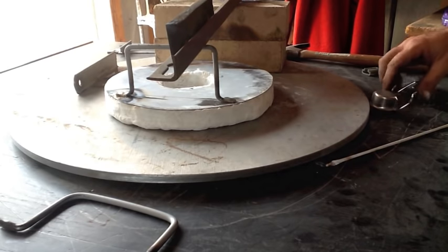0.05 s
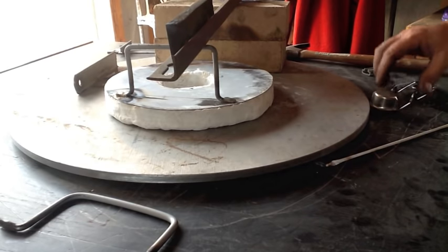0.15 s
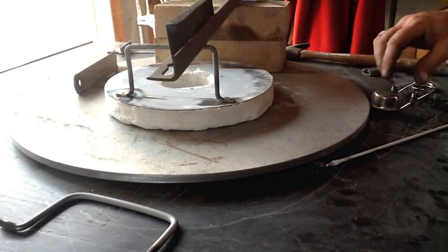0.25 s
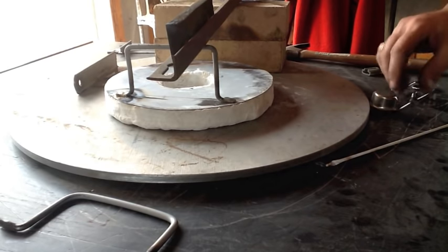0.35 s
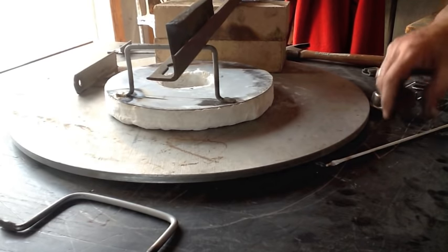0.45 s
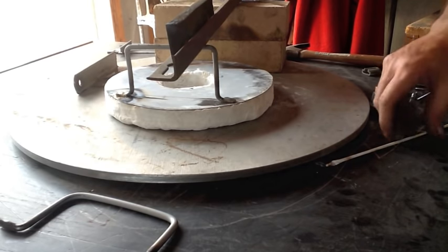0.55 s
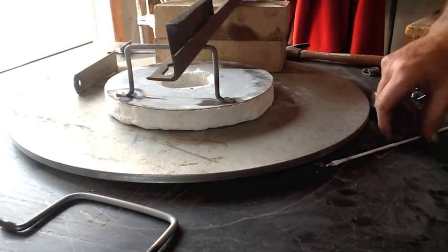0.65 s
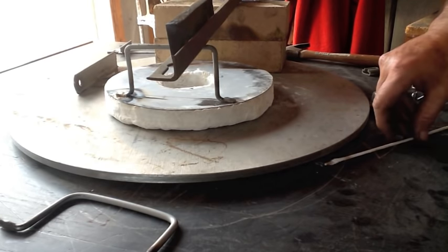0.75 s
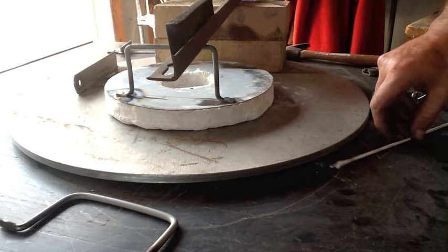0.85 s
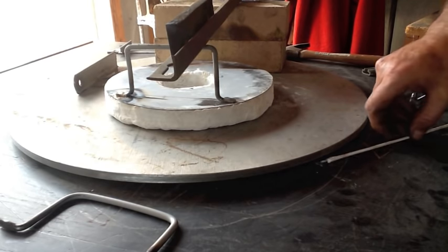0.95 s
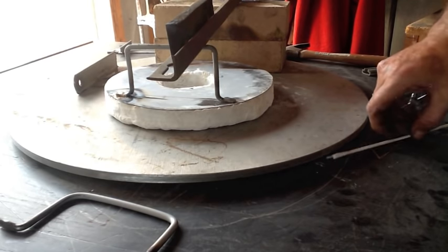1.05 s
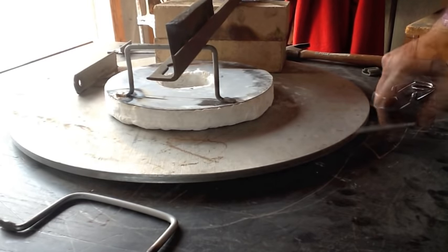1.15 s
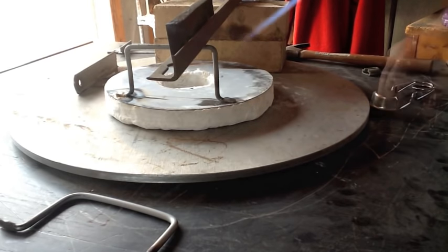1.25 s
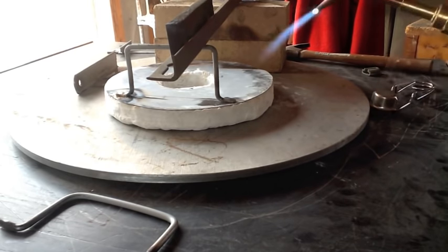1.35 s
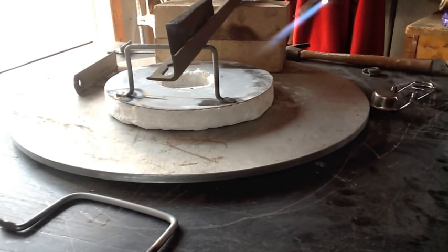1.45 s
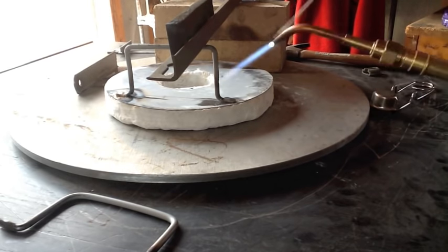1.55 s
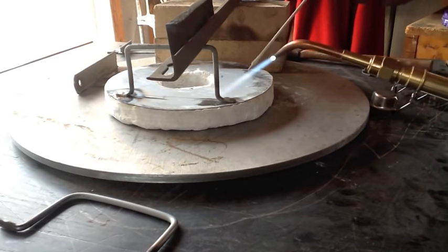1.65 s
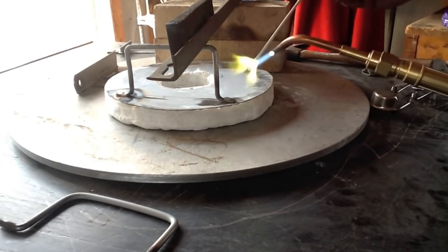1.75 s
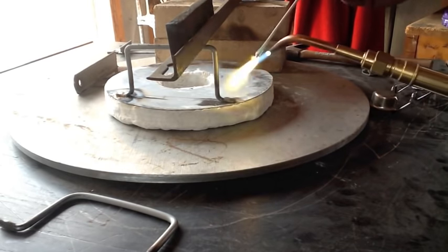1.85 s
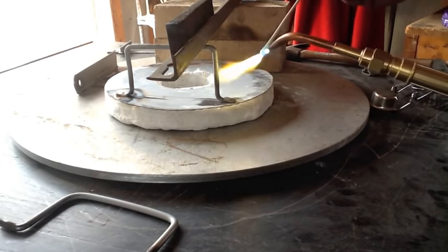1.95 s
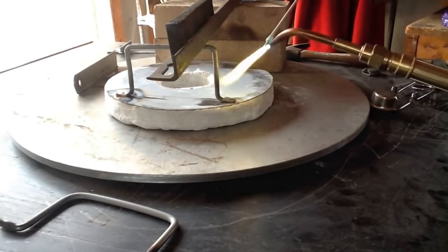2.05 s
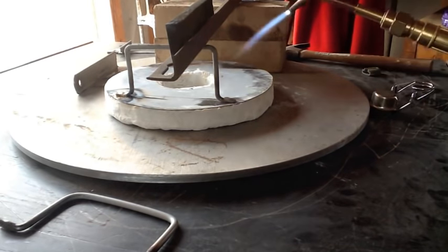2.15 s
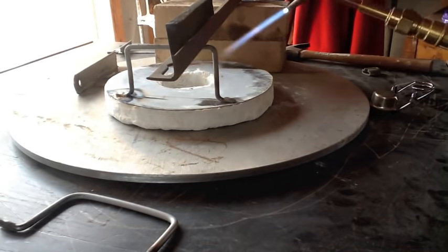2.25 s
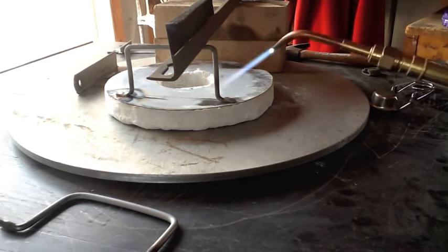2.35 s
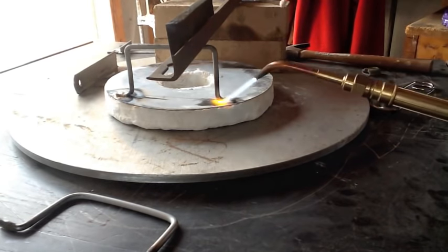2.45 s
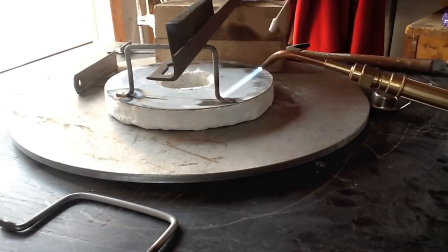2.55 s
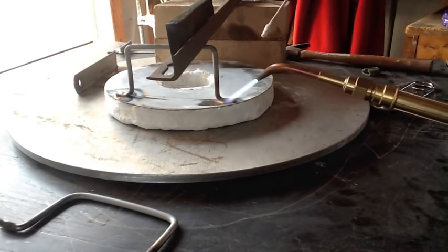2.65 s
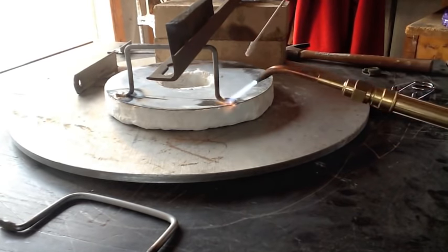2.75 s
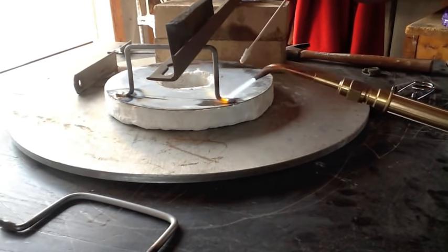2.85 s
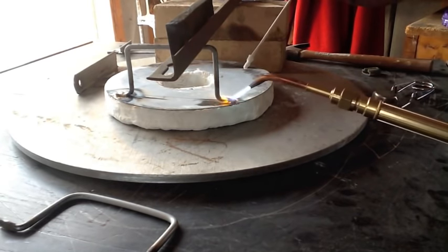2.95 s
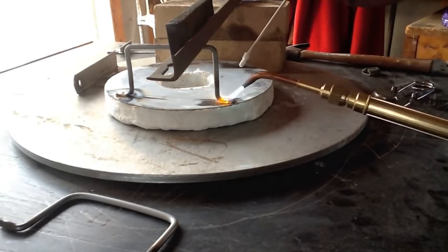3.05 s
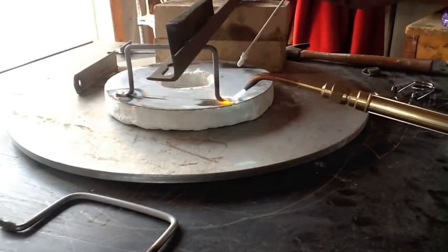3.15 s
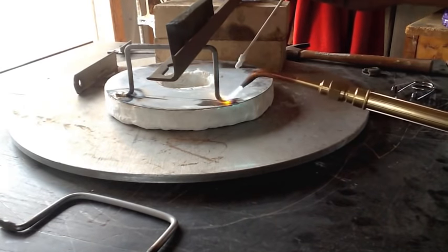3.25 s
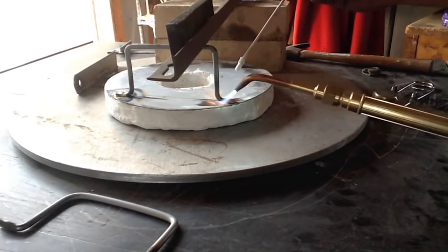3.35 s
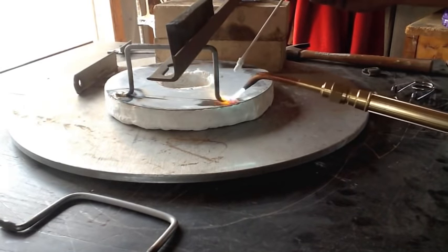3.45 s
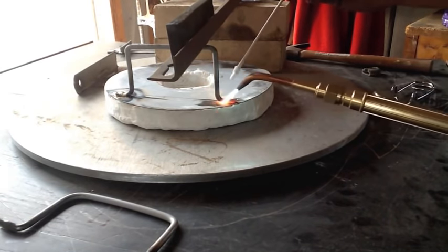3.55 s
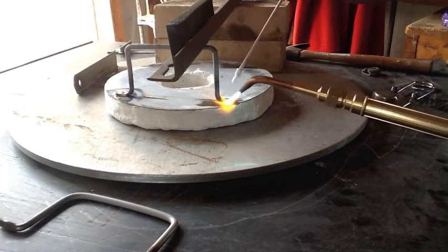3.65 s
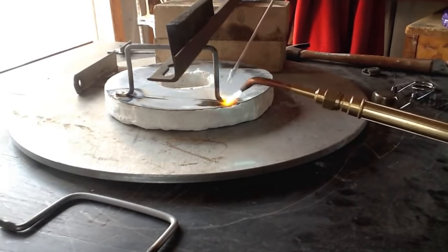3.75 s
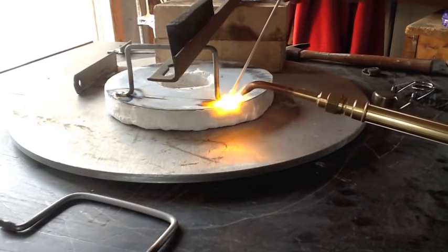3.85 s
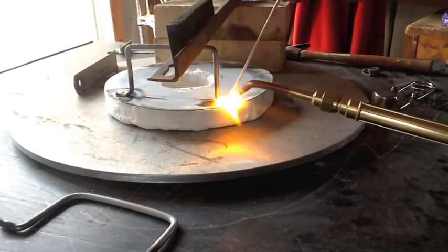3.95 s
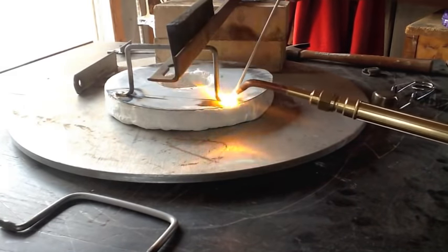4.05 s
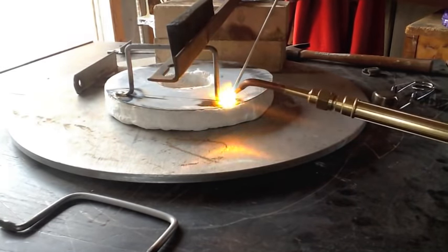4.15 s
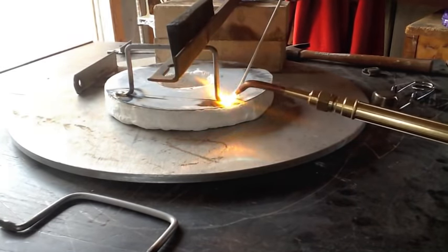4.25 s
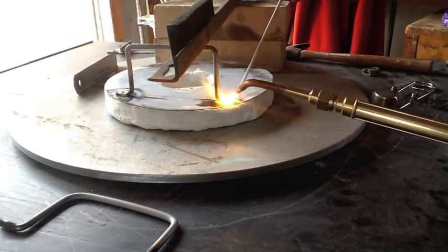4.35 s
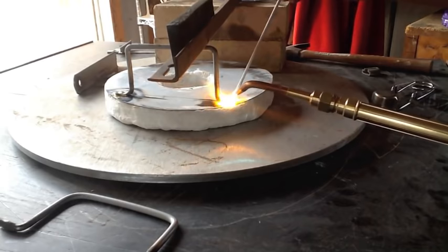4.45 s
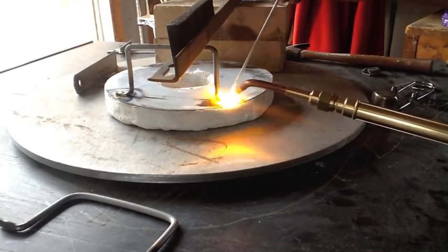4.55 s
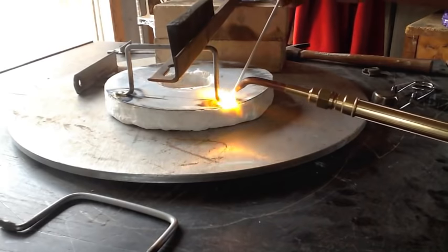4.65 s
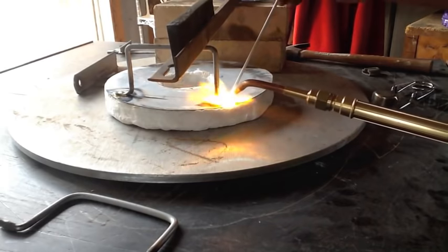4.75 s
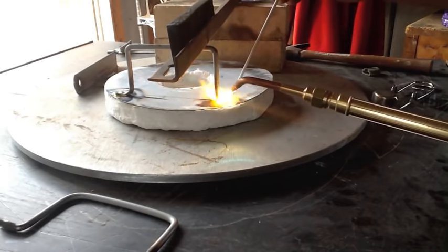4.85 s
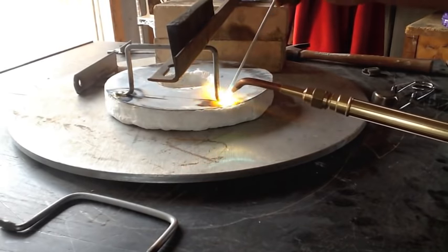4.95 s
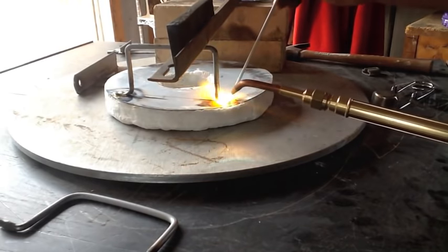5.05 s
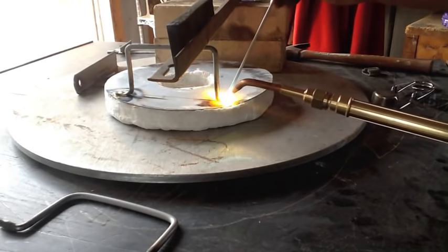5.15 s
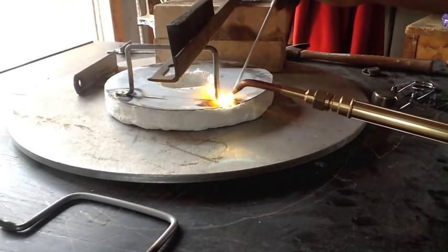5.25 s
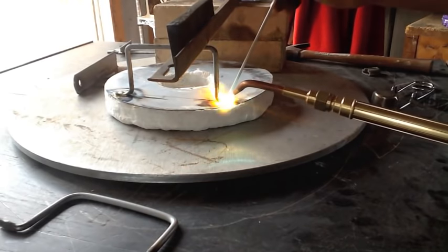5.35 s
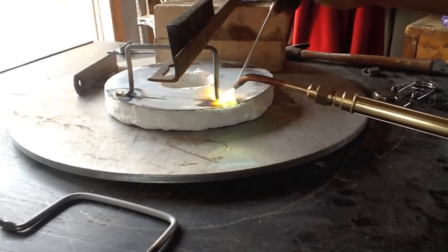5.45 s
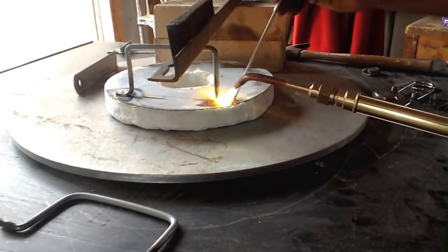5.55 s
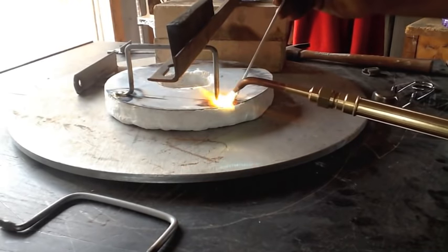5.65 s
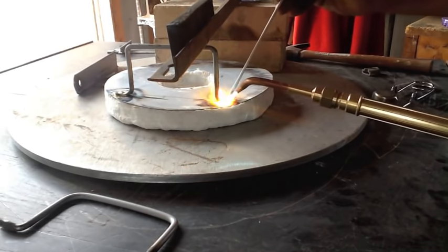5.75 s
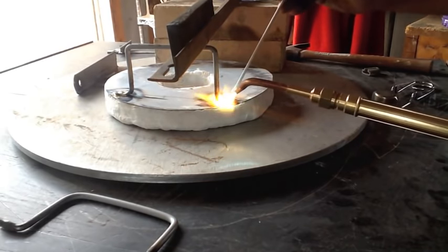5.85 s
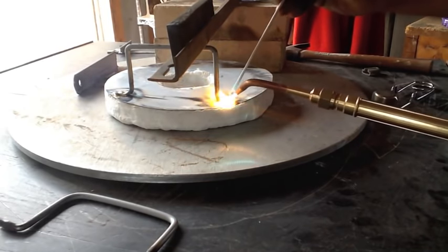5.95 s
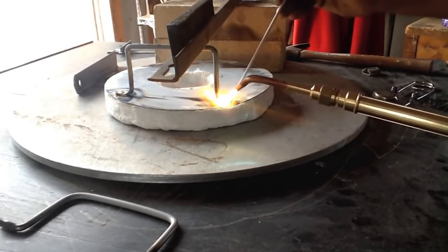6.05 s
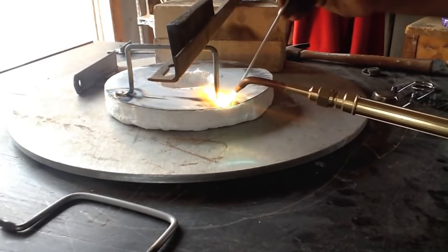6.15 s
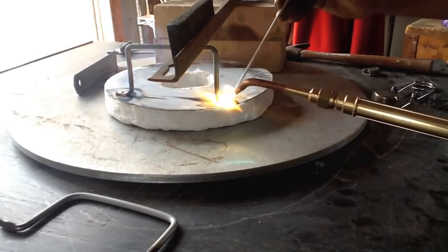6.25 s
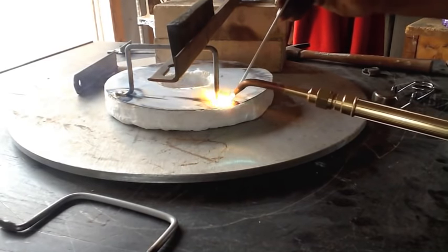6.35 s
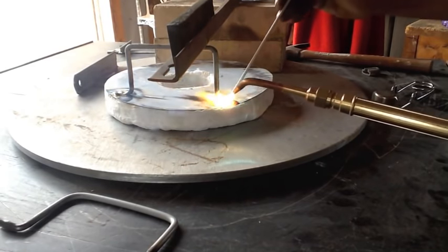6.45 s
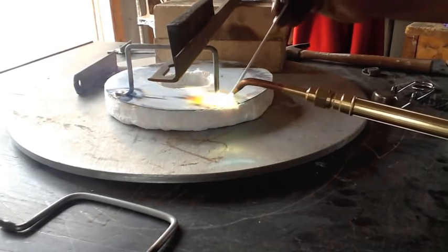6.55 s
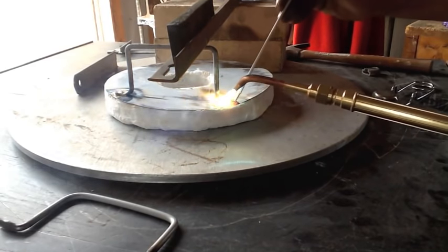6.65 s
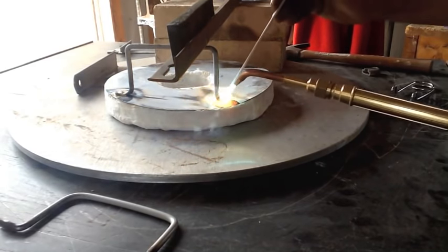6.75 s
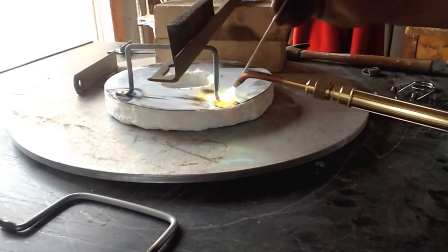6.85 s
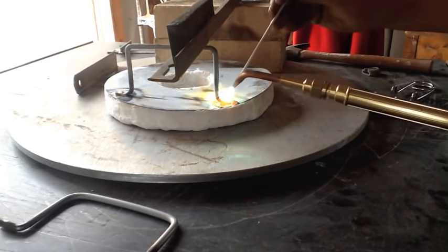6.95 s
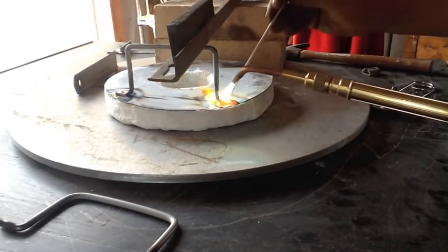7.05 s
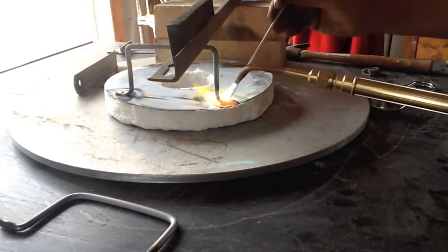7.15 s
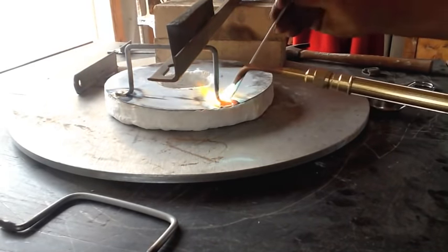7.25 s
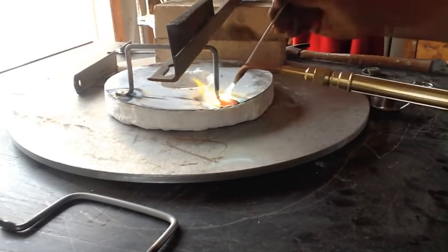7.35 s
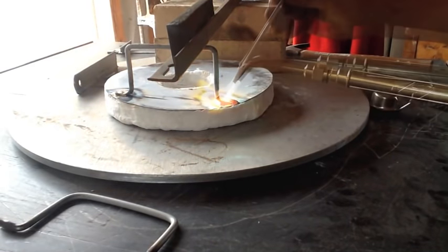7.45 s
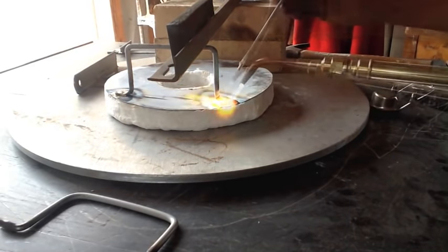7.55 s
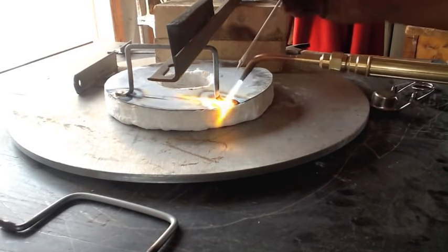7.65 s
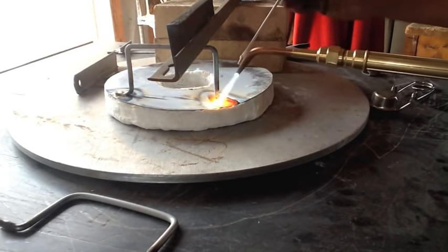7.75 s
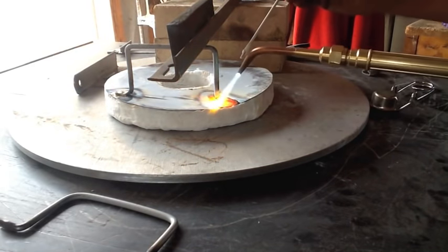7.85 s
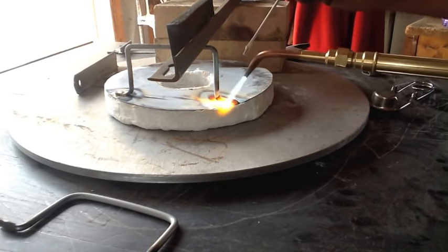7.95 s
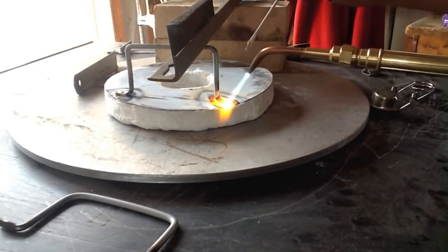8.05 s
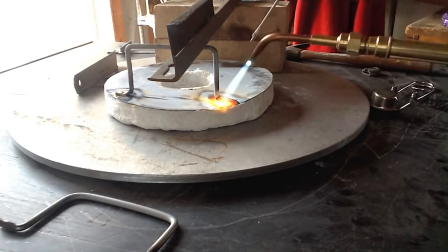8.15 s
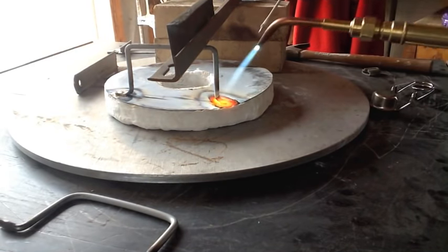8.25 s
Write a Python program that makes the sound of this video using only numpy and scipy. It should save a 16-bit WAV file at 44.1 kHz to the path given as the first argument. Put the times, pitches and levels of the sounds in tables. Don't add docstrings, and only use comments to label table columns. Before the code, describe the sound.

A steel striker clanks twice on a bench in a humming workshop, then a torch hisses, flutters and pops before the room rumble returns.

```python
import sys
import numpy as np
from scipy import signal
from scipy.fft import rfft, irfft, next_fast_len
from scipy.io import wavfile

SR = 44100
rng = np.random.default_rng(int(sys.argv[2]) if len(sys.argv) > 2 else 0)


def bounce(signal):
    frames = np.transpose(np.atleast_2d(signal))
    limited = np.clip(frames, -1, 1)
    pcm = np.round(limited * 32767).astype(np.int16)
    wavfile.write(sys.argv[1], SR, pcm)


def undo_db(level):
    steps = np.asarray(level, float) / 20
    return 10 ** steps


N = 365941

# start_s, end_s
TO_TORCH, TO_SHOP = (1.15, 1.533), (7.348, 7.85)
SHOP_TOP_HZ, TOP_HZ = 15250, 15760
LOW_CUT_HZ = 736

# freq_hz, level_db (per Hz)
RUMBLE_BEFORE = [(15, -77), (25, -45), (85, -37), (104, -27), (123, -17), (151, -9), (243, -12), (391, -16),
                 (790, -14.5), (1470, -23), (1700, -23), (2040, -29), (2730, -32.5), (3500, -43),
                 (4550, -69), (7700, -120)]
# freq_hz, level_db (per Hz)
RUMBLE_AFTER = [(15, -65), (25, -47), (145, 1), (325, -8.5), (416, -4), (471, -6.5), (669, -3), (758, -5.5),
                (932, -4.5), (1010, -7), (1500, -11.5), (1840, -16), (2620, -21), (3500, -26), (4550, -54),
                (7700, -120)]
# freq_hz, level_db (per Hz)
AIR = [(880, -33), (1500, -36), (1820, -9), (2460, -7), (4100, -9.5), (4470, -9), (15100, -17)]
# rumble_db, air_db
BED_BEFORE, BED_AFTER = (-47, -51.5), (-45.5, -50)
AIR_FLICKER_DB, RUMBLE_AFTER_FLICKER_DB = 0.6, 0.8
ECHO_DB, ECHO_T60_S = (11, 17), (0.31, 0.14)

HUM_HZ, HUM_SAG_HZ_PER_S = 124.8, 2.75
HUM_ORDERS_DB, HUM_THROB_DB = (-49, -60.5, -73), (1.0, 5.5, 3)
HUM_START_DB = 7.5
HUM_SINK_S, HUM_SINK_DB_PER_S = 1.04, 18
THIRD_S, THIRD_RISE_S, THIRD_DB = 1.2, 0.13, 18.5
# centre_s, lift_db, length_s
HUM_SWAYS = [(.32, 1, 0.17), (.54, 0, .06), (.64, 3, .12), (.845, -11, 0.056), (1.09, 3, .06)]

# time_s, pitch_hz, level_db
WHINE_EARLY = [(1.66, 1282, -59), (1.71, 1270, -55), (1.755, 1258, -59), (1.8, 1245, -52.5),
               (1.9, 1220, -53), (1.97, 1200, -58), (2.04, 1184, -56), (2.1, 1172, -60)]
WHINE_MIDDLE = [(4.02, 1102, -60), (4.19, 1082, -58), (4.35, 1058, -61), (4.55, 1042, -58),
                (4.85, 1021, -54), (5.15, 1008, -63), (5.3, 1012, -70), (5.6, 1025, -65), (5.9, 1036, -63),
                (6.08, 1048, -64), (6.3, 1057, -55), (6.62, 1041, -55), (6.78, 1026, -64)]
WHINE_FAR = [(7.17, 1210, -83), (7.4, 1194, -64), (7.68, 1180, -62)]
# time_s, pitch_hz, level_db
COASTING = [(4.35, 1047, -60), (4.9, 1016, -57.5), (5.2, 1003, -62.5), (5.75, 1031, -62)]
PULLING = [(5.5, 1033, -70), (5.9, 1034, -65), (6.3, 1048, -59.5), (6.8, 1037, -70)]
# multiple (of the reference line), level_db
ORDERS_EARLY = [(.752, -7), (1, 0)]
ORDERS_SINGLE = [(1, 0.9)]
COASTING_ORDERS = [(.5, -20), (0.699, -15), (1.23, -11)]
PULLING_ORDERS = [(.4, -24), (.72, -15), (.8, -14), (1.2, -6), (1.4, -1)]

# time_s, level_db
DRAG = [(8.15, -39), (8.19, -39), (8.203, -32), (8.22, -53), (8.236, -34), (8.26, -26), (8.285, -25),
        (8.3, -45)]
# start_s, peak_db
SLIPS = [(8.167, -30), (8.184, -31), (8.2003, -28), (8.212, -37), (8.223, -32), (8.2353, -27), (8.239, -29),
         (8.244, -25), (8.255, -33), (8.2595, -27), (8.269, -34), (8.271, -21), (8.274, -34), (8.2805, -31),
         (8.284, -32), (8.2885, -31), (8.295, -26)]
# freq_hz, width_hz, level_db
BENCH = [(242, 50, 1.5), (418, 90, -2), (630, 80, 2), (800, 150, -2), (1270, 200, -10)]

# start_s, peak_db, ring_db, room_db, dulling_db (per octave above the first crack mode)
CLANKS = [
    (.0539, -6, -21.5, -17, -.5),
    (.0884, -14, -21.5, -20, -2),
]
# freq_hz, level_db, t60_s
CRACK = [(2330, 6.5, 0.017), (2070, -5, .03), (2900, -2, .010), (3450, 3.5, 0.013), (4100, 3.5, .007),
         (4880, 5.5, 0.0105), (7130, -9, 0.015), (8170, -13, .015), (9450, -9, 0.018), (10400, -14, .02),
         (14650, -13, .03)]
# freq_hz, level_db, t60_s
STEEL = [(305, -3, 0.07), (362, -4, 0.09), (538, -4, 0.12), (800, -6, 0.11), (1050, -9, 0.083),
         (2336, -3, 0.14), (2625, -6, 0.11), (3235, -8, 0.12), (3930, -7, .13), (5930, -3, 0.1),
         (6500, -5, 0.1), (9170, -4, 0.2), (13050, -11, 0.3), (14700, -7, .08), (14910, -5, .07)]
# freq_hz, level_db, t60_s
EARLIER_RING = [(744, -7, 0.28), (787, -13, 0.16), (843, -6, 0.23), (1073, -4, 0.072), (1440, -2, 0.15),
                (1900, -13, .26), (5800, -19, 0.23), (6710, -16, .25), (6821, -13, .25), (8630, -12, 0.23),
                (8680, -16, 0.22), (10660, -16, 0.2), (10800, -16, .2), (14710, -8, .072)]
# freq_hz, level_db (per Hz)
CLANK_TAIL = [(88, -39), (150, -34), (249, -11), (979, -6), (1190, -11.5), (2270, -4.5), (2980, -7.5),
              (4760, -10), (13700, -19), (14800, -22), (16000, -41)]
SHOP_T60_S = 0.22
BLOOM_S = 0.0032
CONTACT_S = 0.00028

# time_s, pitch_hz, level_db
SQUEAL = [(3.26, 5200, -60), (3.28, 5120, -58), (3.32, 5200, -55), (3.345, 4750, -59)]
SQUEAL_WIDTH_HZ = 130

# centre_s, peak_db, pitch_hz
TICKS = [(1.3975, -33, 4000), (1.545, -34, 5000), (2.4402, -34, 5000), (2.4485, -33, 5900),
         (2.4571, -37, 6300), (2.4636, -35, 3900), (2.4824, -30, 7300), (2.5054, -28, 5400),
         (2.5362, -37, 7200), (2.5529, -33, 5600), (2.5583, -30, 7300), (2.5612, -32, 6600),
         (2.5765, -34, 7100), (2.5792, -36, 5700), (2.5821, -30, 7700), (2.5854, -36, 7300),
         (2.5999, -37, 5800), (2.6044, -34, 6800), (2.6126, -37, 4400), (2.6651, -36, 5600),
         (2.6856, -33, 6400), (2.8249, -36, 4500), (2.8683, -31, 4200), (4.3678, -36, 6000),
         (4.9951, -36, 7000), (5.0999, -36, 4100), (5.409, -34, 9700), (6.4342, -37, 7000),
         (6.4363, -35, 7200)]
TICK_CYCLES = 0.55

# start_s, peak_db, pitch_hz
POPS = [(1.8045, -32, 1890), (2.2057, -26, 1730), (2.4632, -29, 1980), (2.482, -31, 1800),
        (2.604, -41, 1500), (3.0469, -36, 1070), (2.62, -31, 1890), (2.8499, -23, 1550),
        (2.8599, -29, 1310), (2.825, -37, 1680), (2.891, -29, 1550), (3.0366, -32, 1350),
        (3.1215, -36, 1170), (3.2167, -33, 1230), (3.5865, -22, 1560), (3.595, -26, 1150),
        (3.6244, -29.5, 1350), (3.7174, -32, 2050), (2.9833, -31, 1450), (3.961, -33, 1200),
        (4.041, -23.5, 1580), (4.1597, -25, 1270), (4.171, -24.5, 1460), (4.2603, -28, 1440),
        (4.7584, -29, 2020), (5.0702, -33, 1960), (5.1196, -37, 2350), (5.4082, -33, 1830),
        (5.4517, -30, 2060), (5.9106, -37, 2120), (6.116, -34, 2244), (6.2351, -39, 1963),
        (2.868, -31, 1500), (2.8678, -26, 3080), (2.825, -33, 3400), (3.586, -40, 2900), (4.171, -39, 2300),
        (2.8745, -35, 1300), (2.883, -32, 1200), (3.029, -39, 1100), (3.098, -35, 1400), (3.619, -33, 1600),
        (3.630, -33, 1500), (3.635, -39, 1000), (3.670, -37, 1800), (4.017, -35, 1200), (4.167, -34, 1700),
        (4.179, -35, 1400), (4.268, -38, 1300), (5.919, -39, 1000)]
AFTER_POP_S, AFTER_POP_DB = 0.0045, -13
# start_s, peak_db, centre_hz, length_s
COUGHS = [(1.873, -48.5, 750, 0.032), (2.183, -49, 650, 0.026), (2.463, -52, 600, 0.022),
          (2.848, -42.5, 900, 0.05), (3.025, -46.5, 900, 0.041), (3.111, -44.5, 750, 0.017),
          (3.2, -48, 750, 0.026), (3.582, -39.5, 800, 0.0085), (3.617, -50, 800, 0.015),
          (3.943, -45.5, 900, 0.032), (4.147, -46, 900, 0.039), (4.249, -46.5, 450, 0.038),
          (4.301, -49, 700, 0.071), (5.91, -55, 873, 0.02), (6.749, -48.5, 420, 0.033),
          (6.947, -52, 520, 0.037), (7.019, -60, 450, 0.027)]
# start_s, peak_db, centre_hz, t60_s
SPITS = [(1.581, -42.5, 4830, 0.065), (1.662, -43, 4870, .1), (2.448, -42, 6500, .03),
         (2.481, -50, 10500, .02), (2.505, -36, 4770, 0.012), (2.557, -50, 10500, 0.023),
         (2.579, -50, 10500, 0.027), (4.75, -43.5, 3500, 0.078), (4.991, -42.5, 7000, 0.033),
         (5.092, -46, 3400, 0.067), (5.407, -45, 11930, 0.08), (2.137, -45, 2060, .12),
         (2.263, -42.5, 1950, 0.12), (2.284, -44, 1900, .12), (2.424, -43.5, 1550, 0.071)]
SPIT_WIDTH = 0.33

# freq_hz, level_db (per Hz)
HISS = [(1470, -35.5), (2500, -19), (2780, -5), (3070, -7), (3370, -5), (4050, -4), (5500, -0.5), (6320, 0),
        (9200, -4.5), (15600, -14.5)]
# freq_hz, level_db (per Hz)
BREATH = [(24, -68), (40, -49), (297, -40), (453, -24), (560, -16.5), (667, -17.5), (734, -12.5), (1020, 0),
          (1120, -1.5), (1260, 0.5), (1470, -2), (1820, -2), (2290, -3.5), (4000, -13), (5200, -35),
          (8800, -120)]
HISS_DB, BREATH_DB = -48, -55.5
HISS_GUST_DB, BREATH_GUST_DB = -0.2, 0.45
# time_s, level_db
ROAR = [(1.15, -50.5), (1.4, -45.5), (1.72, -38), (1.8, -43.5), (2.0, -42.5), (2.06, -43.5), (2.14, -42),
        (2.45, -42), (2.52, -74), (2.75, -50.5), (3.1, -51), (3.55, -50.5), (3.9, -57), (4.4, -54),
        (5.0, -50.5), (5.4, -54.5), (6.3, -57.5), (7.5, -58)]
# freq_hz, width_hz, level_db
NOZZLE = [(1230, 80, -4.5), (1550, 125, -1.5), (1890, 120, 1.5), (2215, 170, -1), (2780, 210, -4.5),
          (3530, 370, -7.5), (4790, 530, -7.5), (7000, 1200, -16), (2037, 82, -5.5)]
# centre_s, roar_db, length_s, hiss_lift_db
FLARES = [(1.28, -50, 0.078, 4), (1.395, -48.5, 0.086, 0), (1.56, -51, 0.031, -1), (1.667, -56, 0.058, 4),
          (2.55, -43.5, 0.068, -0.5), (2.581, -42, 0.023, 1), (2.605, -46, 0.057, -2.5),
          (2.661, -45, 0.02, 2), (2.87, -54, 0.045, 0), (3.07, -55, 0.072, 1), (3.29, -71, 0.23, 1),
          (3.365, -68, .04, -1), (3.59, -51, 0.021, -2), (3.69, -46.5, 0.026, 0), (3.753, -49, 0.093, -1),
          (3.928, -63, 0.053, 2.5), (4.115, -57, 0.08, 0.5), (4.59, -60, 0.074, 1.5),
          (4.733, -49, .03, 1.5), (4.764, -46, 0.037, 3.5), (4.903, -63, 0.045, 0), (5.065, -54, .02, -2),
          (5.122, -45, 0.046, 1), (5.408, -50, 0.03, 1.5), (5.45, -53, .025, 2), (5.653, -56, .08, 0.5),
          (6.122, -44.5, 0.032, 1), (6.187, -45.5, 0.074, 1.5), (6.246, -47, 0.057, 0.5),
          (6.374, -58, 0.12, 0), (6.55, -53, 0.091, -1.5)]
# centre_s, lift_db, length_s
GULPS = [(1.335, 2, .04), (1.46, 2, .04), (1.55, 5, .02), (1.59, 0, 0.033), (1.669, -2, .012),
         (1.697, -2, .04), (1.74, 1, .03), (1.785, -2, .03), (1.806, 7, .015), (1.826, -7, .025),
         (1.87, -1, .04), (1.928, 2.5, .05), (1.98, -5, .02), (1.996, 3.5, .025), (2.025, 4, .02),
         (2.057, -4, .025), (2.075, 0, .02), (2.09, -3, .02), (2.115, 6, .025), (2.146, 5, .02),
         (2.17, 6, 0.013), (2.205, 2, .03), (2.235, -1, .04), (2.27, 0, .02), (2.292, 0, 0.03),
         (2.328, 0, .03), (2.348, 5, .02), (2.39, -6, .02), (2.422, 3, .03), (2.455, -4, .03)]


def rms_one(x):
    return x / np.sqrt(np.mean(x ** 2) + 1e-20)


def in_time(rows):
    s, *columns = np.transpose(rows)
    return [np.interp(np.arange(N) / SR, s, c) for c in columns]


def fader(rows, in_s, out_s):
    t = np.arange(N) / SR
    fade_in = np.clip((t - rows[0][0]) / in_s, 0, 1)
    fade_out = np.clip((rows[-1][0] - t) / out_s, 0, 1)
    return fade_in * fade_out


def crossfade():
    return np.interp(np.arange(N) / SR, TO_TORCH + TO_SHOP, [0, 1, 1, 0])


def bell(s, length_s):
    t = np.arange(N) / SR
    return np.cos(np.pi * np.clip((t - s) / length_s, -0.5, 0.5)) ** 2


def bumps(rows):
    return sum(db * bell(s, length_s * 1.16) for s, db, length_s in rows)


def drift(rate_hz):
    r = np.exp(-80 * np.pi * rate_hz / SR)
    noise = rng.standard_normal(N // 40 + 2002)
    slow = signal.lfilter([1], [1, -2 * r, r * r], noise)[2000:]
    return np.interp(np.arange(N) / 40, np.arange(len(slow)), rms_one(slow))


def coloured(spectrum, flicker_db):
    size = next_fast_len(N)
    hz, db = np.transpose(spectrum)
    bins_hz = np.arange(size // 2 + 1) * SR / size
    shape = undo_db(np.interp(np.log(bins_hz + 1), np.log(hz), db))
    noise = rng.standard_normal(N) * undo_db(flicker_db)
    return rms_one(irfft(rfft(noise, size) * shape, size)[:N])


def resonate(x, hz, width_hz):
    r = np.exp(-np.pi * width_hz / SR)
    zeros = np.array([1, 0, -1]) * (1 - r * r) / 2
    return signal.lfilter(zeros, [1, -2 * r * np.cos(2 * np.pi * hz / SR), r * r], x)


def body(x, peaks):
    return sum((-1) ** k * undo_db(db) * resonate(x, hz, width) for k, (hz, width, db) in enumerate(peaks))


def ring(hz, t60, length, turn=None):
    t = np.arange(length) / SR
    start = rng.random() if turn is None else turn
    return np.sin(2 * np.pi * (hz * t + start)) * undo_db(-60 * t / t60)


def cut_above(x, hz):
    return signal.sosfilt(signal.ellip(10, 0.3, 80, hz, fs=SR, output="sos"), x)


def cut_below(x, order, hz):
    return signal.sosfilt(signal.butter(order, hz, "high", fs=SR, output="sos"), x + 1e-18)


def add(out, s, sound):
    at = round(s * SR)
    out[at:at + len(sound)] += sound[:N - at]


def motor_hum():
    t = np.arange(N) / SR
    turns = np.cumsum((HUM_HZ - HUM_SAG_HZ_PER_S * t) * (1 + 0.0096 * drift(6.8))) / SR
    sink_db = HUM_SINK_DB_PER_S * np.maximum(t - HUM_SINK_S, 0)
    first_db = bumps(HUM_SWAYS) + HUM_START_DB * np.exp(-t / 0.12) - sink_db
    third_db = THIRD_DB * np.clip((t - THIRD_S) / THIRD_RISE_S + 1, 0, 1)
    hum = np.zeros(N)
    for k, (db, lift_db) in enumerate(zip(HUM_ORDERS_DB, (first_db, 0, third_db))):
        level = undo_db(db + 4.5 + lift_db + HUM_THROB_DB[k] * drift(12))
        hum += level * np.sin(2 * np.pi * (k + 1) * turns)
    return hum


def workshop():
    t = np.arange(N) / SR
    air = cut_above(coloured(AIR, AIR_FLICKER_DB * drift(13.0)), SHOP_TOP_HZ)
    rumble_echo, air_echo = (1 + undo_db(db - 60 * t / t60) for db, t60 in zip(ECHO_DB, ECHO_T60_S))
    rumble = undo_db(BED_BEFORE[0] + 1.5) * coloured(RUMBLE_BEFORE, 0.35 * drift(12.0))
    before = rumble_echo * rumble + undo_db(BED_BEFORE[1]) * air_echo * air
    later_rumble = coloured(RUMBLE_AFTER, RUMBLE_AFTER_FLICKER_DB * drift(13.0))
    after = undo_db(BED_AFTER[0] + 1.5) * later_rumble + undo_db(BED_AFTER[1]) * air
    return (1 - crossfade()) * np.where(t < TO_SHOP[0], before + motor_hum(), after)


def engine(rows, orders):
    hz, db = in_time(rows)
    turns = np.cumsum(hz * (1 + 0.0012 * drift(11.5))) / SR
    beat = 1 + 0.33 * np.sin(2 * np.pi * np.cumsum(12 + 3.9 * drift(2.2)) / SR)
    lines = sum(undo_db(level_db + 0.67 * drift(6.2)) * np.sin(2 * np.pi * k * turns) for k, level_db in orders)
    return fader(rows, 0.022, 0.023) * undo_db(db + 2.0) * beat * lines


def far_engines():
    whines = engine(WHINE_EARLY, ORDERS_EARLY) + engine(WHINE_MIDDLE, ORDERS_SINGLE)
    whines = whines + engine(WHINE_FAR, ORDERS_SINGLE)
    return whines + engine(COASTING, COASTING_ORDERS) + engine(PULLING, PULLING_ORDERS)


def drag():
    s, db = np.transpose(SLIPS)
    grains = (rng.random(N) < 900 / SR) * rng.standard_normal(N)
    grit = grains + 0.038 * rng.standard_normal(N)
    catches = np.zeros(N)
    catches[(s * SR).astype(int)] = undo_db(db + 30.5)
    level = fader(DRAG, 0.032, 0.004) * undo_db(in_time(DRAG)[0] - 9.5)
    return level * rms_one(body(grit, BENCH)) + body(catches + 1e-18, BENCH)


def struck(modes, dull_db, length, same_push):
    t = np.arange(length) / SR
    out = np.zeros(length)
    first_mode_hz = CRACK[0][0]
    for hz, db, t60 in modes:
        level = undo_db(db + dull_db * max(np.log2(hz / first_mode_hz), 0))
        bloom = np.minimum(t / BLOOM_S * max(hz / first_mode_hz, 1) ** 3, 1) ** 0.64
        turn = 0.5 - hz * CONTACT_S if same_push else None
        out += level * bloom * ring(hz, t60, length, turn)
    return out


def striker():
    out, length = np.zeros(N), SR // 3
    t = np.arange(length) / SR
    tail = coloured(CLANK_TAIL, 0.61 * drift(65))
    earlier = sum(undo_db(db) * ring(hz, min(t60, 0.25), length) for hz, db, t60 in EARLIER_RING)
    add(out, 0, undo_db(-28.0 + 2.8 * drift(80)[:length]) * earlier)
    for k, (s, db, ring_db, room_db, dull_db) in enumerate(CLANKS):
        rough = 1 + 0.12 * rng.standard_normal(length)
        crack = 0.43 * rough * struck(CRACK, dull_db, length, True)
        steel = undo_db(ring_db) * struck(STEEL, dull_db, length, False)
        room = tail[k * length:][:length] * undo_db(-60 * t / SHOP_T60_S) * (1 - np.exp(-t / 0.00028))
        add(out, s, undo_db(db) * (crack + steel + undo_db(room_db) * room))
    return cut_above(out + 1e-18, SHOP_TOP_HZ)


def squeal():
    hz, db = in_time(SQUEAL)
    level = fader(SQUEAL, 0.03, 0.005) * undo_db(db + 6)
    return level * drift(SQUEAL_WIDTH_HZ) * np.sin(2 * np.pi * np.cumsum(hz) / SR)


def ticks():
    out, t = np.zeros(N), np.arange(-40, 40) / SR
    for s, db, hz in TICKS:
        envelope = np.exp(-(t * hz / TICK_CYCLES) ** 2)
        add(out, s + t[0], undo_db(db + 3) * np.sin(2 * np.pi * hz * t + 1) * envelope)
    return cut_below(out, 4, 2 * LOW_CUT_HZ)


def sputter():
    out, length = np.zeros(N), SR // 10
    t = np.arange(length) / SR
    relit = [(s + AFTER_POP_S * (1 + 0.293 * a), db + AFTER_POP_DB + 3 * b, hz * (1 + 0.21 * c))
             for (s, db, hz), (a, b, c) in zip(POPS, rng.standard_normal((len(POPS), 3)))]
    for s, db, hz in list(POPS) + relit:
        envelope = (2.44 * hz * t) ** 0.71 * np.exp(-1.7 * hz * t)
        add(out, s, undo_db(db + 3.5) * np.sin(2 * np.pi * hz * t) * envelope)
    for s, db, hz, length_s in COUGHS:
        ragged = rng.standard_normal(length) ** 3
        puff = ragged * np.sin(np.pi * np.clip(t / length_s, 0, 1))
        add(out, s, undo_db(db - 5.0) * rms_one(resonate(puff, hz, 0.92 * hz)) * np.sqrt(length_s * 10))
    out = cut_below(out, 3, LOW_CUT_HZ)
    for s, db, hz, t60 in SPITS:
        puff = rms_one(resonate(rng.standard_normal(length), hz, SPIT_WIDTH * hz))
        add(out, s, undo_db(db + 2 - 60 * t / t60) * puff)
    return out


def torch():
    flutter, gust = drift(23), drift(2.5)
    swell, lift_db = undo_db(in_time(ROAR)[0]), np.zeros(N)
    for s, db, length_s, hiss_db in FLARES:
        flare = bell(s, length_s * 1.3)
        swell = swell + undo_db(db) * flare
        lift_db = lift_db + hiss_db * flare
    swell = swell * undo_db(bumps(GULPS))
    hiss_flicker_db = 0.5 * flutter + 0.5 * drift(30) + HISS_GUST_DB * gust
    hiss = undo_db(HISS_DB + lift_db) * coloured(HISS, hiss_flicker_db)
    breath_flicker_db = 0.46 * flutter + 0.52 * drift(7.6) + BREATH_GUST_DB * drift(2.6)
    breath = undo_db(BREATH_DB + 3.5) * coloured(BREATH, breath_flicker_db)
    eddies = rng.standard_normal(N) * undo_db(1.44 * drift(55) + 0.91 * drift(22) + 0.28 * flutter)
    roar = undo_db(-3.0) * swell * rms_one(body(eddies, NOZZLE))
    return crossfade() * (hiss + breath) + fader(ROAR, 0.07, 0.12) * roar


def scene():
    background = workshop() + far_engines()
    bench = drag() + striker()
    flame = squeal() + ticks() + sputter() + torch()
    mono = background + bench + flame
    return np.array([mono, mono])


def roll_off(x):
    return signal.sosfilt(signal.butter(12, 16500, fs=SR, output="sos"), x)


def record(dry):
    mix = cut_above(dry, TOP_HZ)
    return roll_off(mix)


dry = scene()
out = record(dry)
bounce(out)
```